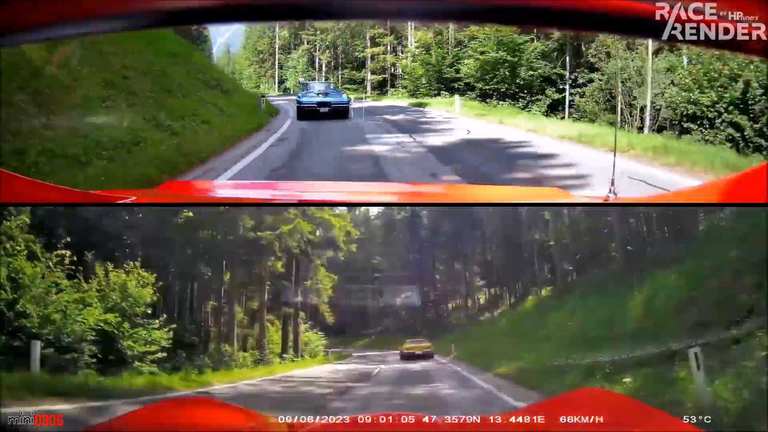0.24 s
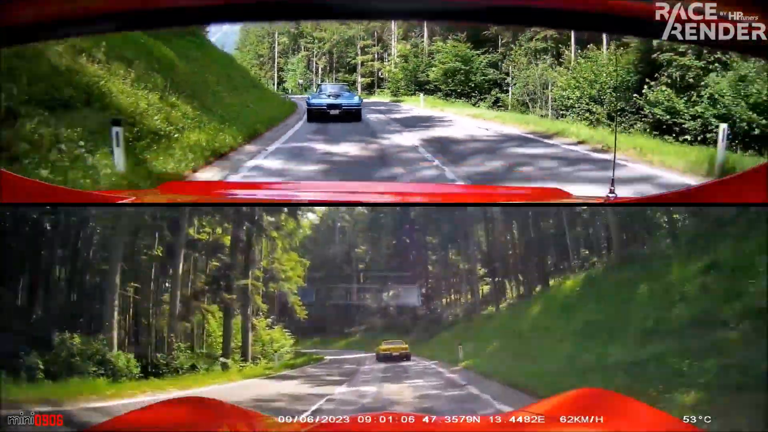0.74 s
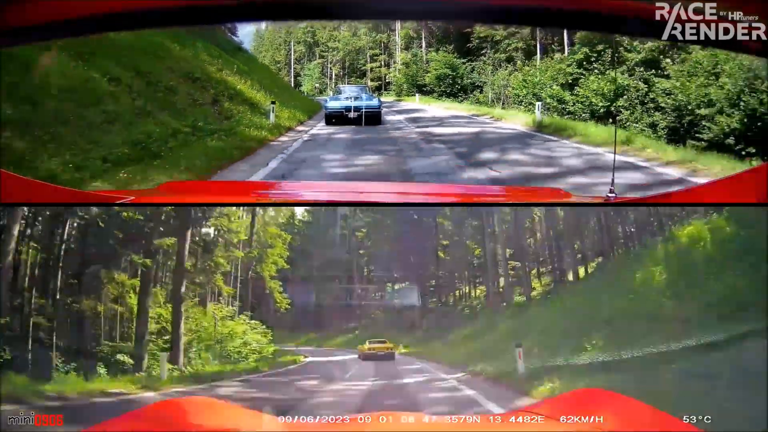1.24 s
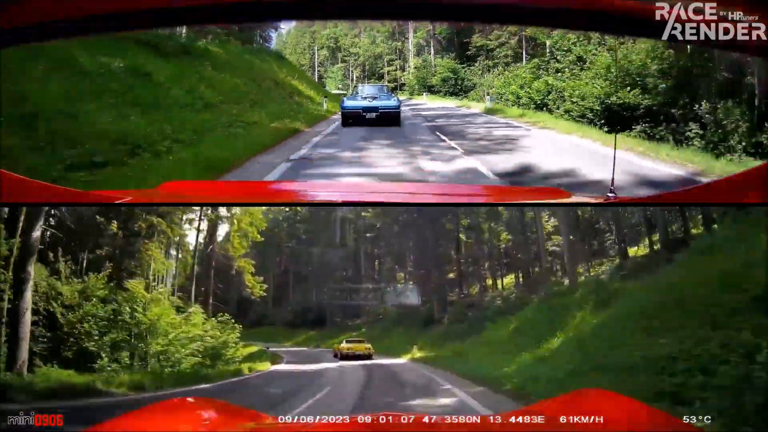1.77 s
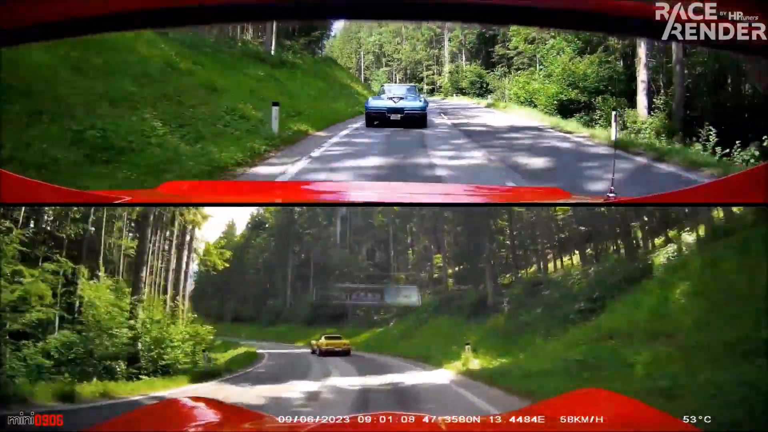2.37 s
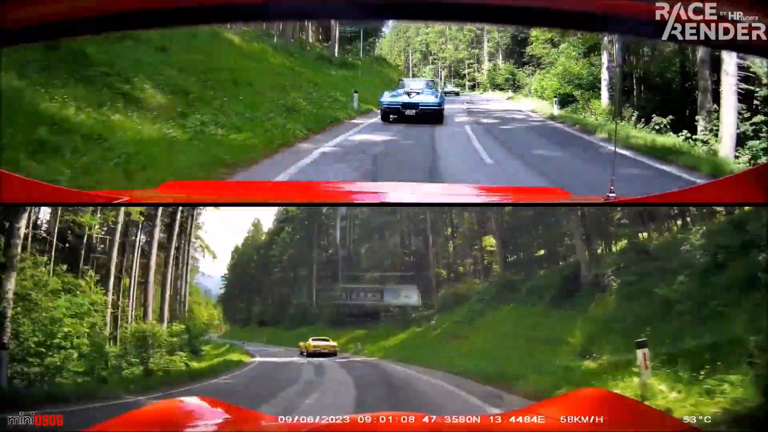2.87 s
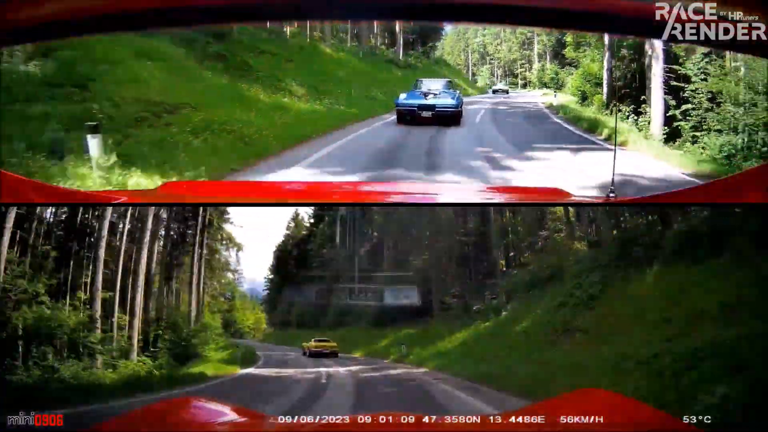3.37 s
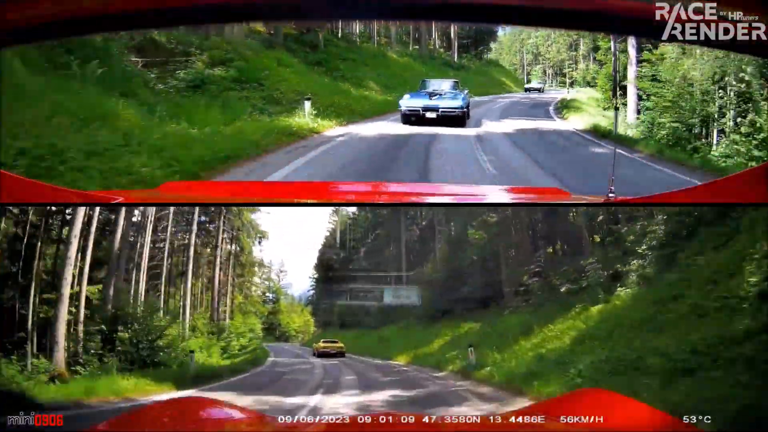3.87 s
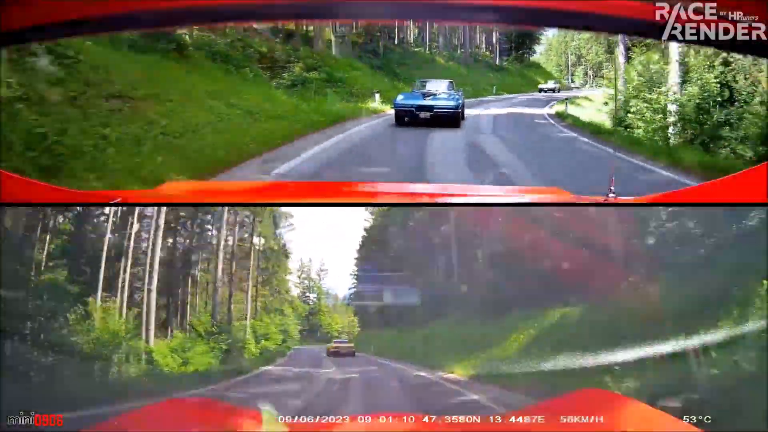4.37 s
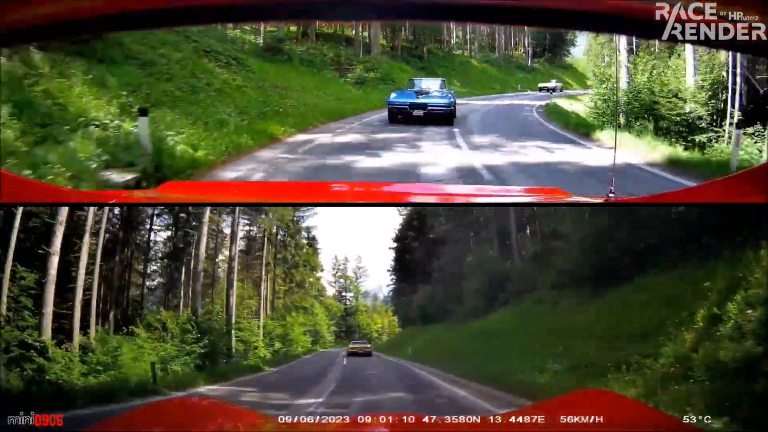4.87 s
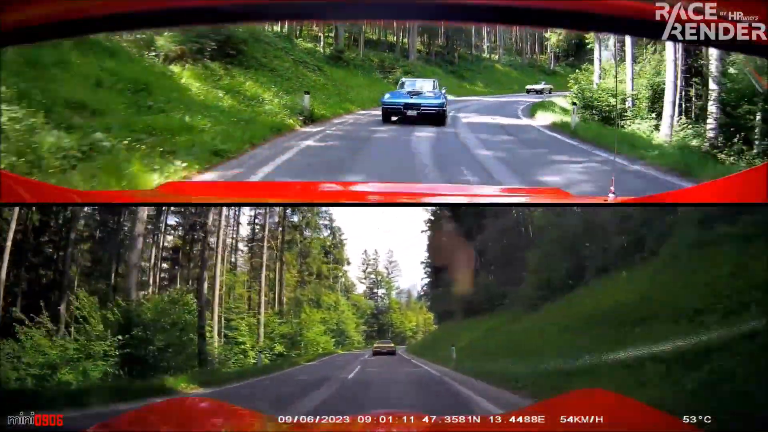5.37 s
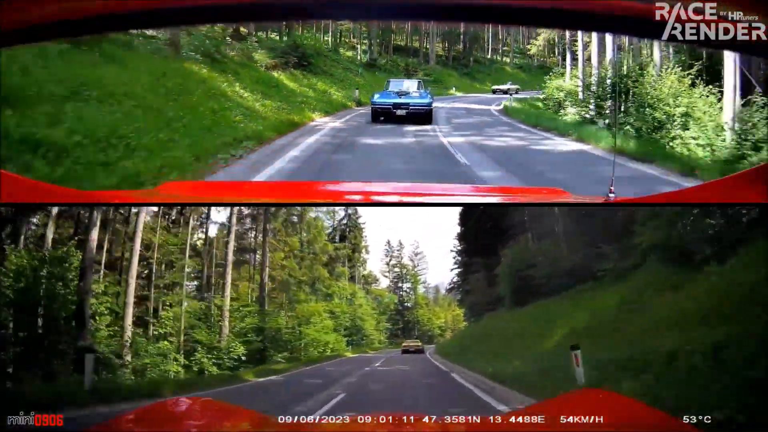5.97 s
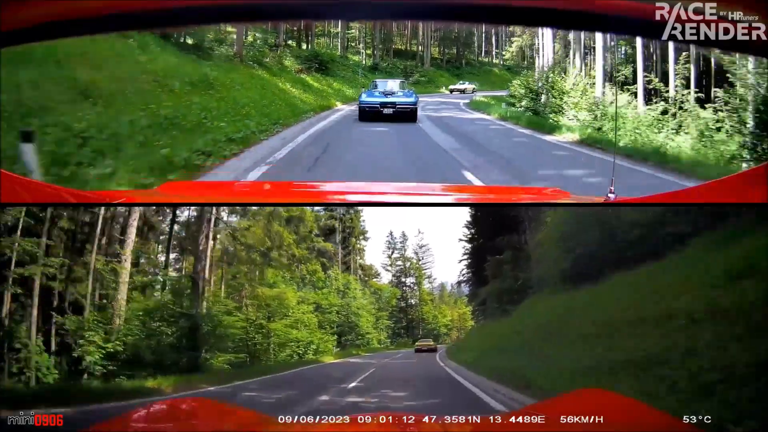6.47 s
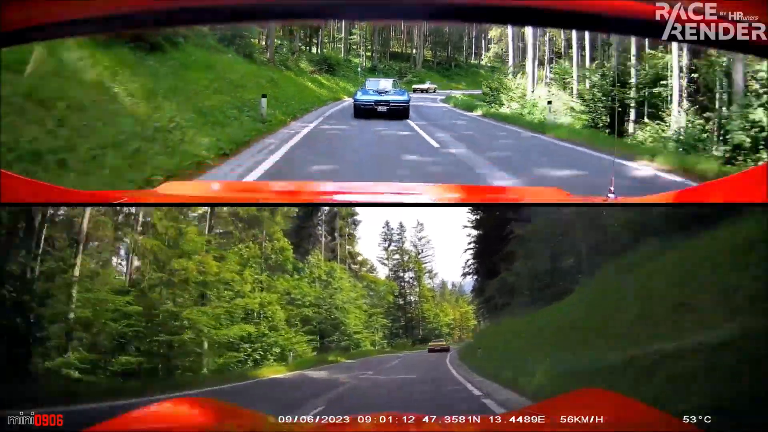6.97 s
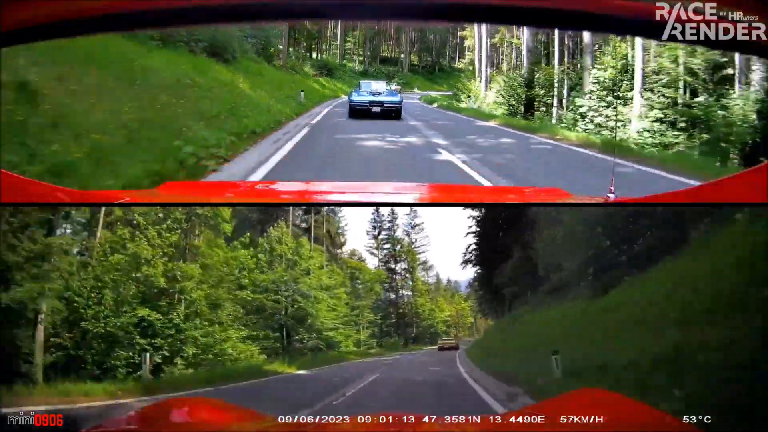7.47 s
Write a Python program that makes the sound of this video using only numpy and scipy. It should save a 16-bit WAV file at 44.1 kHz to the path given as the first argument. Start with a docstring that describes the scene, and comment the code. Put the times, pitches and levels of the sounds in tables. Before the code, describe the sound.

Inside an old open car, a V8 burbles softly on the overrun, then the throttle opens and it pulls with a deep, raspy drone.

```python
"""A soft eight-cylinder burble coasts inside a classic car, then the throttle opens and it pulls with a deep drone.
The drone is a sum of engine-order sinusoids; the rasp is exhaust pulses ringing pipes; the clatter is throbbing noise.
Rasp and clatter grow with the load over filtered noise for tyres and wind, humming panels and faint puffs of hiss.
Loose trim ticks now and then as decaying noise bursts through resonances.
The dashboard camera adds a thin whine and mirrors the sound faintly into the treble."""
import sys
import numpy as np
from scipy import signal
from scipy.fft import rfft, irfft, next_fast_len
from scipy.io import wavfile
from scipy.ndimage import uniform_filter1d, map_coordinates

SR = 44100
rng = np.random.default_rng(int(sys.argv[2]) if len(sys.argv) > 2 else 0)


def file_out(sig):
    """Save sig as 16-bit WAV at sys.argv[1]."""
    # one column per channel
    cols = np.atleast_2d(sig).T
    # limit, then scale
    lim = np.clip(cols, -1, 1)
    pcm = np.round(lim * 32767).astype(np.int16)
    wavfile.write(sys.argv[1], SR, pcm)


N = 341334

THROTTLE_AT_S, THROTTLE_OPENS_S = 3.58, 0.15  # the pedal starts down, and how long that takes


def amp(db):
    """Decibels to amplitude: 20 dB is a factor of ten."""
    return 10 ** (np.asarray(db) / 20)


def unit(x):
    """Level normalization: scale to an rms of 1."""
    return x / np.sqrt(np.mean(x ** 2) + 1e-20)


def curves(rows):
    """Linear interpolation: one value per sample for each column after the time."""
    times_s, *columns = np.transpose(rows)
    return [np.interp(np.arange(N) / SR, times_s, column) for column in columns]


def wobble(rate):
    """Slow random modulation: a smooth curve through random knots, rate knots a second."""
    knots = rng.standard_normal(int(N * rate / SR) + 4)
    return map_coordinates(knots, [np.arange(N) * rate / SR])


def swell(at, bumps):
    """Lorentzian gain in dB near (centre, half width, dB) bumps, in frequency or in time."""
    return sum(db / (1 + ((at - centre) / width) ** 2) for centre, width, db in bumps)


def filtered(x, response):
    """Linear filtering: multiply the spectrum by a response that is a function of frequency."""
    size = next_fast_len(N + SR // 2)
    spectrum = rfft(x, size) * response(np.fft.rfftfreq(size, 1 / SR))
    return irfft(spectrum, size)[:N]


def coloured(x, points):
    """Spectral shaping: a gain curve through (Hz, dB) points on a log frequency axis."""
    hz_points, db_points = np.transpose(points)
    return filtered(x, lambda hz: amp(np.interp(np.log(hz + 1), np.log(hz_points), db_points)))


def ringing(x, modes):
    """Modal resonance: parallel second-order (Hz, width Hz, dB) modes of alternating sign."""
    def response(f):
        total = 0
        for k, (centre, width, db) in enumerate(modes):
            damping = 1j * f * width
            total = total + (-1) ** k * amp(db) * damping / (centre * centre - f * f + damping)
        return total
    return filtered(x, response)


def rush(patchy_db):
    """Turbulent noise: white noise with drifting patches of gain in time and frequency."""
    z = signal.stft(rng.standard_normal(N), nperseg=512)[2]
    across_frequency = uniform_filter1d(rng.standard_normal(z.shape), size=5, axis=0)
    patches = uniform_filter1d(across_frequency, size=14, axis=1)
    return signal.istft(z * amp(patchy_db * unit(patches)), nperseg=512)[1][:N]


PUFF_FIRST_S, PUFF_EVERY_S = 0.27, 1
PUFF_DB, PUFF_ATTACK_S, PUFF_HOLD_S, PUFF_RELEASE_S = -59, 0.006, 0.035, 0.16
# Spectral shape of the puff. Each row: frequency in Hz, relative gain in dB.
PUFF_SPECTRUM = [(1500, -13.5), (3000, -2), (5200, 4), (6500, -2), (7800, -8.5)]


def puffs():
    """Amplitude modulation of noise: a soft hiss starts abruptly, holds and fades, at a steady slow beat."""
    since = (np.arange(N) / SR - PUFF_FIRST_S) % PUFF_EVERY_S
    corners_s = np.cumsum([0, PUFF_ATTACK_S, PUFF_HOLD_S, PUFF_RELEASE_S])
    envelope = np.interp(since, corners_s, [0, 1, 1, 0])
    hiss = unit(coloured(rng.standard_normal(N), PUFF_SPECTRUM))
    return amp(PUFF_DB + 0.8 * wobble(5.3)) * envelope * hiss


RUSH_DB, HUM_DB = -35, -33  # tyres and wind before the pull; panel hum before its swell
RUSH_GROWS_DB_PER_S = 0.17  # from the moment the throttle opens
# Spectral shape of tyres and wind. Each row: frequency in Hz, relative gain in dB.
ROAD_SPECTRUM = [(20, -8), (42, -6), (65, 3.5), (120, 7.5), (260, 0), (420, -5), (850, -4.5), (1200, -8),
                 (1700, -10.5), (2300, -25.5), (3200, -25), (4000, -33), (5200, -35), (7500, -49)]
# Cabin panels shaken by the tyres. Each row: resonance in Hz, width in Hz, relative gain in dB.
PANEL_MODES = [(177, 17, 4.5), (239.4, 21.6, 1), (316.2, 41, 2.5), (470.4, 21, 1), (556, 65, -3.5),
               (761, 19.3, 1.5), (961, 93, -2), (1152, 134, -4), (1490, 95, -10.5)]
# The panels hum louder late in the coast. Each row: centre in seconds, half width in seconds, gain in dB.
HUM_SWELLS = [(2.75, 0.29, 1.4)]


def road():
    """Broadband excitation of tyres and wind with fluttering treble, and forced resonance of the cabin panels."""
    t = np.arange(N) / SR
    rush_db = RUSH_DB + RUSH_GROWS_DB_PER_S * np.maximum(t - THROTTLE_AT_S, 0)
    hum_db = HUM_DB + swell(t, HUM_SWELLS)
    broad = unit(coloured(rush(patchy_db=0.95), ROAD_SPECTRUM))
    treble = filtered(broad, lambda hz: hz ** 6 / (hz ** 6 + 1900 ** 6))  # above about 1900 Hz
    broad = broad + treble * (amp(2.8 * wobble(40)) - 1)
    panels = ringing(rush(patchy_db=0.67), PANEL_MODES)
    panels = unit(coloured(panels, [(60, -19.0), (150, -2), (1400, -1.5), (2500, -14.5), (6000, -52)]))
    return amp(rush_db + 0.84 * wobble(8.3)) * broad + amp(hum_db + 0.3 * wobble(9.3)) * panels


# Trim snaps. Each row: start in seconds, relative level in dB, centre of the snap's band in Hz.
TRIM_TICKS = [(0.734, -27, 2585), (0.839, -29, 2800), (.905, -27, 5000), (1.5325, -22, 3823),
              (2.3164, -26.5, 2300), (4.2364, -25, 4020), (4.7064, -21.5, 3000), (5.073, -15, 2800)]
# Resonances of the trim. Each row: resonance in Hz, width in Hz, relative gain in dB.
TRIM_MODES = [(1480, 250, 5.5), (2370, 370, 1), (3140, 420, -4.5), (5200, 830, -12)]


def ticks(t60=0.035, spread=1.24):
    """Impact excitation: loose trim snaps against the dashboard as decaying noise bursts, some brighter."""
    t = np.arange(SR // 20) / SR
    blows = np.zeros(N + SR)
    for start_s, db, hz in TRIM_TICKS:
        band = signal.butter(1, [hz / spread, hz * spread], "bandpass", fs=SR)
        snap = signal.lfilter(*band, rng.standard_normal(len(t)))
        # each burst falls 60 dB in t60 seconds; 7 dB offsets the loss in the band filter
        blows[round(start_s * SR):][:len(t)] += amp(db + 7 - 60 * t / t60) * snap
    return coloured(ringing(blows[:N], TRIM_MODES), [(3500, -4.5), (7000, -5)])


COAST_LOAD, LOAD_LAG_S = 0.16, 0.17  # engine load (0-1) with the pedal up; time constant of its rise


def pedal():
    """First-order lag: the throttle opens in one quick ramp and the load follows exponentially; both 0-1."""
    since = np.maximum(np.arange(N) / SR - THROTTLE_AT_S, 0)
    throttle = np.minimum(since / THROTTLE_OPENS_S, 1)
    load = 1 - (1 - COAST_LOAD) * np.exp(-since / LOAD_LAG_S)
    return throttle, np.clip(load, 0, 1)


CLATTER_DB_PER_OCTAVE, CRUISE_HZ = 10.5, 142.5  # growth with firing rate, about this rate
# Spectral shape of the clatter. Each row: frequency in Hz, relative gain in dB.
CLATTER_SPECTRUM = [(100, -12), (300, -3), (520, 1), (850, -2.5), (1200, -6), (1550, -5.5), (2000, -14),
                    (2400, -21), (2850, -17.5), (3400, -19.5), (4100, -33), (5200, -29), (7500, -45.5)]


def clatter(firings, firing_hz, load, lope=0.14, beat=0.049, rumble_beat=0.73):
    """Periodic modulation: gas and valve noise over a rough low rumble, throbbing with the exhaust lopes."""
    lopes = 2 * np.pi * firings * 3 / 8  # three lopes in eight firings
    throb = 1 + beat * np.cos(lopes) + lope * np.cos(2 * lopes)
    speed_db = CLATTER_DB_PER_OCTAVE * np.log2(firing_hz / CRUISE_HZ)
    hiss = unit(coloured(rush(patchy_db=2.0) * throb, CLATTER_SPECTRUM))
    hiss_db = -34.5 + speed_db - 8.6 * (1 - load) + 0.34 * wobble(16)
    gas = rush(patchy_db=1.5) * (1 + rumble_beat * np.cos(lopes))
    rumble_shape = [(45, -23), (85, -1), (130, -4.5), (210, 3), (300, -7), (600, -24), (2500, -74.0)]
    rumble = unit(coloured(gas, rumble_shape))
    rumble_db = -32.5 - 19.5 * (1 - load) + 1.3 * wobble(22)
    return hiss * amp(hiss_db) + rumble * amp(rumble_db)


# Cylinders in firing order. Each row: relative pulse strength, delay along its exhaust path in seconds.
CYLINDER_PULSES = [(0.56, 0.00023), (0.84, 0.0032), (0.36, 0.00042), (1, 0.00082), (1.37, 0.00086),
                   (0.89, 0.00035), (0.77, 0), (1.14, 0.0045)]
# Exhaust and body resonances. Each row: resonance in Hz, width in Hz, relative gain in dB.
PIPE_MODES = [(291, 120, -6.5), (393, 60, -1.5), (478, 61, -1), (551.5, 58, 0), (727, 39, -2),
              (955, 102, -11), (1488, 57, -14.5)]


def rasp(firings, rasp_db, scatter=0.21, jitter_s=0.00031):
    """Impulse excitation: a pulse per firing rings the pipes; unequal paths and uneven burns roughen the beat."""
    index = np.arange(1, int(firings[-1]))
    late, strong = rng.standard_normal((2, len(index)))
    strength, delay_s = np.array(CYLINDER_PULSES)[index % len(CYLINDER_PULSES)].T
    at = np.interp(index, firings, np.arange(N)) + SR * (delay_s + jitter_s * late)
    pulses = np.bincount(np.clip(at, 0, N - 1).astype(int), strength * (1 + scatter * strong), N)
    pipe = ringing(pulses, PIPE_MODES)
    pipe = coloured(pipe, [(200, -34), (300, -1.5), (1600, 4), (2600, -24.0), (6000, -52)])
    return unit(pipe) * amp(rasp_db)


# Exhaust lines beside the firing note. Each row: multiple of the eight-cylinder cycle rate,
# coasting level in dB, pulling level in dB, both before weighting by load.
EXHAUST_ORDERS = [(3, -66, -62), (4, -71, -42), (5, -66.5, -42), (6, -33.5, -37.5), (7, -59, -41),
                  (9, -55, -39), (10, -37, -55), (11, -71, -31), (12, -60, -38), (13, -68, -34.5),
                  (14, -60, -38.5), (16, -42, -45.5), (17, -71.5, -44), (19, -72.5, -47.5), (21, -64, -43),
                  (22, -69, -40.5), (26, -73, -43.5), (27, -70, -44.5), (28, -73, -46), (30, -68, -51),
                  (31, -71, -46), (32, -70, -40), (33, -72, -46.5), (34, -74, -46), (36, -64, -43.5),
                  (41, -66, -47.5), (42, -71, -46)]
# Cabin and silencer resonances that lift passing lines under load.
# Each row: centre in Hz, half width in Hz, gain in dB.
LINE_BOOMS = [(80.2, 2.6, 7.5), (196.3, 12.8, 6), (515.7, 18, 9)]


def drone(firings, firing_hz, note_db, load):
    """Harmonic synthesis: the firing note, and the lines that uneven firing of the two banks sets around it."""
    cylinders = len(CYLINDER_PULSES)
    out = amp(note_db + .4 * wobble(16)) * np.cos(2 * np.pi * firings)
    for order, coast_db, pull_db in EXHAUST_ORDERS:
        multiple = order / cylinders
        boom_db = swell(multiple * firing_hz, LINE_BOOMS)
        phase = multiple * (firings + 0.011 * wobble(14))
        # coasting lines share a phase; pulling lines are offset by a square law about the firing note
        spread = 2 / 9 * (order - cylinders) ** 2
        coast = (1 - load) * amp(coast_db) * np.cos(2 * np.pi * phase)
        pull = load ** 2 * amp(pull_db + boom_db) * np.cos(2 * np.pi * (phase + spread))
        out += amp(0.63 * np.sqrt(multiple) * wobble(9)) * (coast + pull)
    return np.sqrt(2) * out  # so the dB levels are rms


NOTE_COAST_DB, NOTE_PULL_DB = -34.5, -22  # firing note, pedal up and down, before ebb and booms
RASP_PULL_DB, RASP_DROP_DB = -34.5, 13  # rasp at full load before booms; how much weaker with no load
# Engine speed. Each row: time in seconds, firing rate in Hz before a slight wobble.
FIRING_RATE = [(0.0, 93.6), (0.11, 91.35), (0.3, 89.26), (1.19, 86.7), (2.02, 84.4), (2.37, 83.9),
               (2.5, 83.2), (3.58, 82.5), (3.75, 105.1), (3.99, 119.3), (4.18, 125.1), (4.33, 134.4),
               (4.7, 137.6), (5.8, 140.6), (7.39, 142.4), (7.67, 161.5), (7.74, 166.5)]
# The firing note ebbs late in the coast. Each row: centre in seconds, half width in seconds, gain in dB.
NOTE_EBBS = [(2.65, 0.24, -7.5)]
# The exhaust booms as the firing rate passes its tuning, first for the note, then for the rasp.
# Each row: centre in Hz, half width in Hz, gain in dB.
NOTE_TUNING = [(117.6, 5.2, 5), (158.4, 4.5, 2.5)]
RASP_TUNING = [(127, 7, 4)]


def scene():
    """Superposition: engine speed and pedal drive drone, rasp and clatter, added to the background."""
    firing_hz, = curves(FIRING_RATE)
    throttle, load = pedal()
    coast_db = NOTE_COAST_DB + swell(np.arange(N) / SR, NOTE_EBBS)
    note_db = (1 - throttle) * coast_db + throttle * NOTE_PULL_DB + swell(firing_hz, NOTE_TUNING)
    rasp_db = RASP_PULL_DB - RASP_DROP_DB * (1 - load) + swell(firing_hz, RASP_TUNING)
    firing_hz = firing_hz * (1 + 0.0015 * wobble(9))
    firings = np.cumsum(firing_hz) / SR  # firings elapsed
    background = puffs() + road() + ticks()
    engine = clatter(firings, firing_hz, load) + rasp(firings, rasp_db) + drone(firings, firing_hz, note_db, load)
    return (background + engine)[None]


WHINE_HZ, CAMERA_HZ, TOP_HZ = 7692.3, 16000, 15750  # whine, camera's sampling rate, upper band limit
# Strength of the mirrored treble. Each row: frequency in Hz, gain in dB.
MIRROR_GAIN = [(8300, -12), (9500, -3), (10300, -6.5), (11200, -12.5), (12200, -14.5), (13200, -20),
               (14200, -23.5), (15000, -28.5), (15700, -38.5)]


def record(dry):
    """Spectral imaging: the camera whines, and its low sampling rate mirrors the sound weakly into the treble."""
    t = np.arange(N) / SR
    whine_db = -47.0 + 0.54 * wobble(60) + 0.14 * wobble(7.4)
    whine = np.sqrt(2) * amp(whine_db) * np.sin(2 * np.pi * WHINE_HZ * t)
    sound = filtered(dry[0] + whine, lambda hz: hz < CAMERA_HZ / 2)
    # the conjugate reverses the spectrum, so each frequency f reappears at CAMERA_HZ - f
    image = np.real(np.conj(signal.hilbert(sound)) * np.exp(2j * np.pi * CAMERA_HZ * t))
    hiss = amp(-79) * rng.standard_normal(N)
    heard = filtered(sound + coloured(image, MIRROR_GAIN) + hiss, lambda hz: hz < TOP_HZ)
    offset = -.021  # the converter rests slightly off zero
    return offset + heard[None]


dry = scene()
out = record(dry)
file_out(out)
```